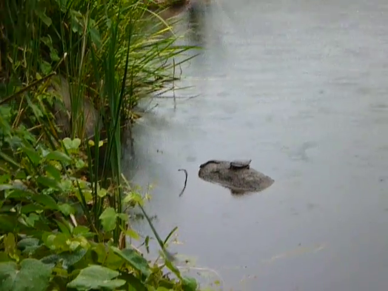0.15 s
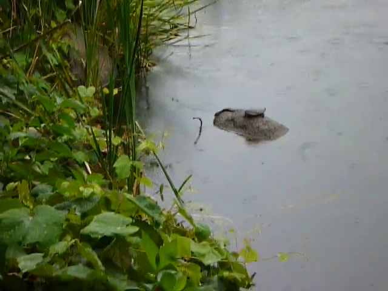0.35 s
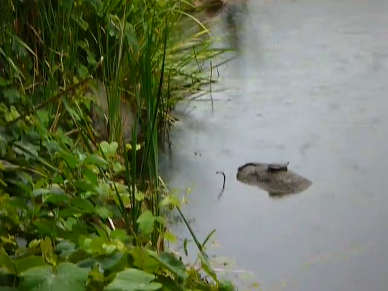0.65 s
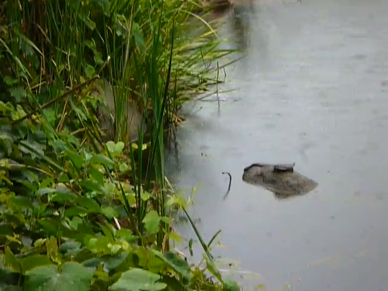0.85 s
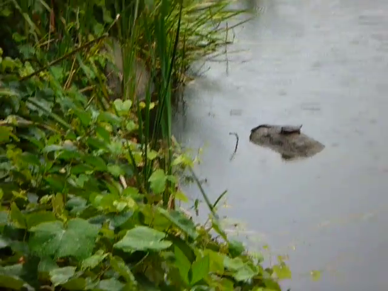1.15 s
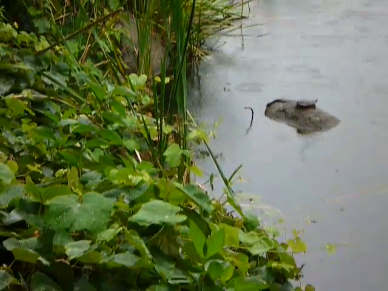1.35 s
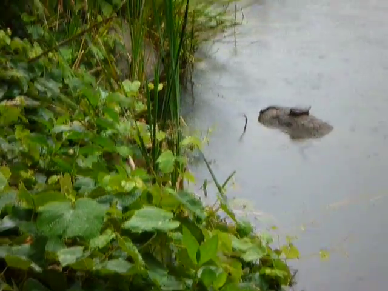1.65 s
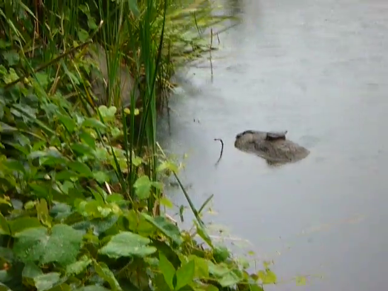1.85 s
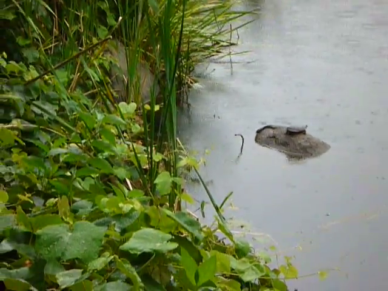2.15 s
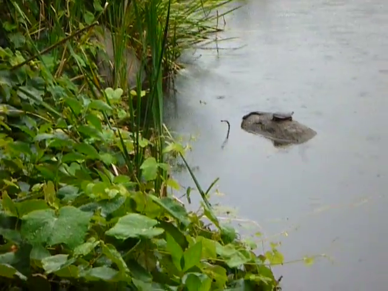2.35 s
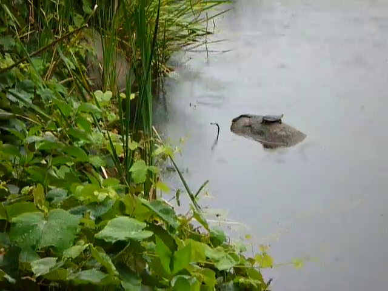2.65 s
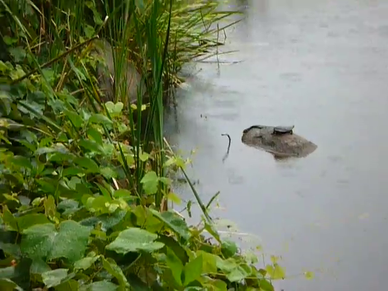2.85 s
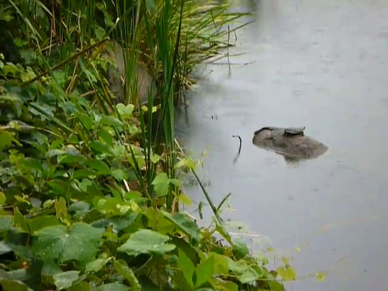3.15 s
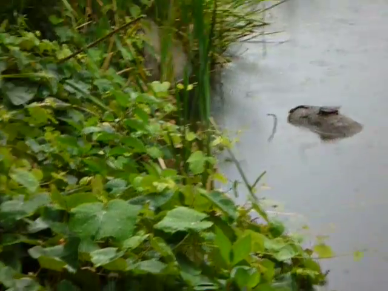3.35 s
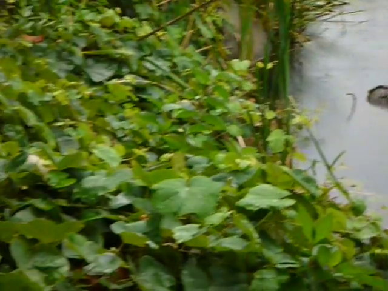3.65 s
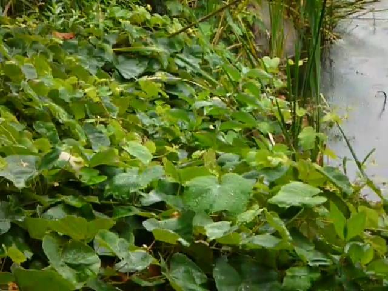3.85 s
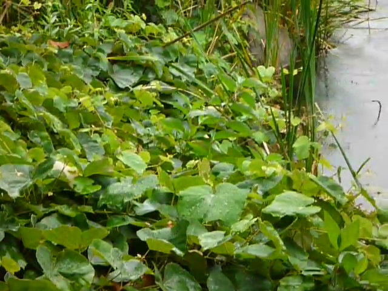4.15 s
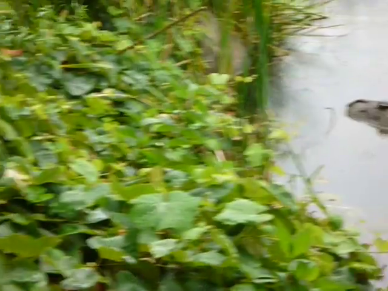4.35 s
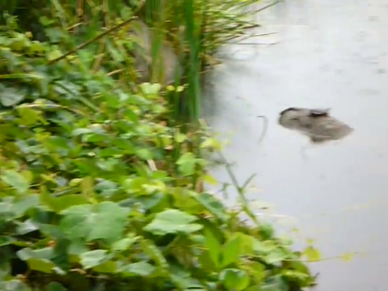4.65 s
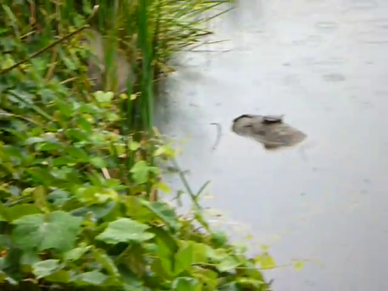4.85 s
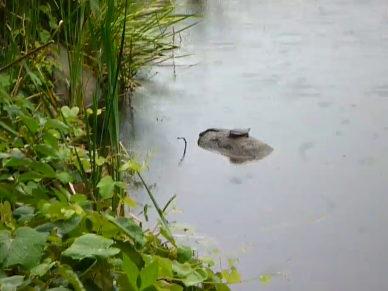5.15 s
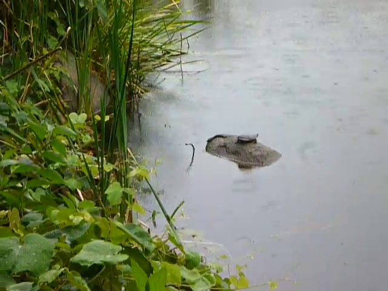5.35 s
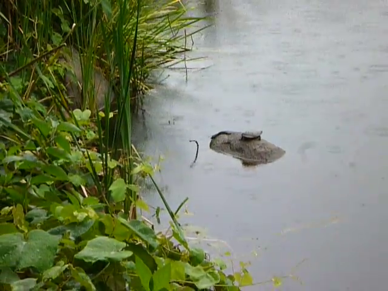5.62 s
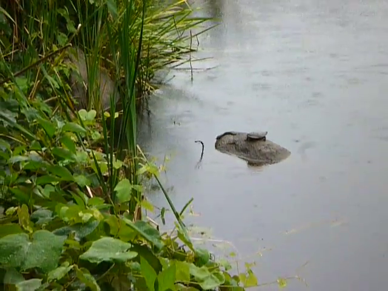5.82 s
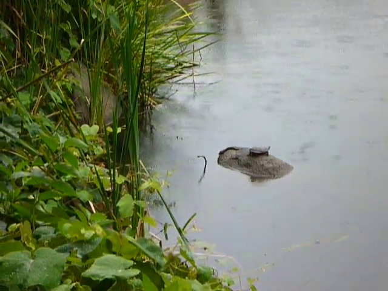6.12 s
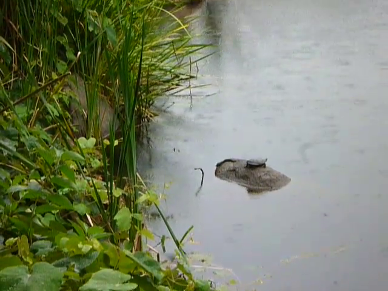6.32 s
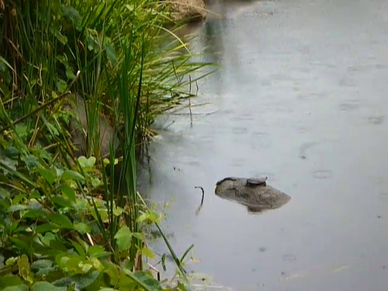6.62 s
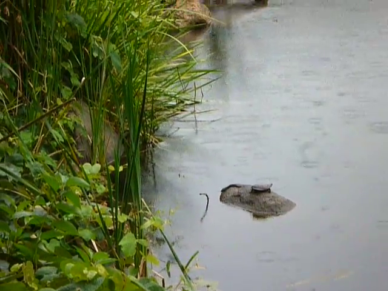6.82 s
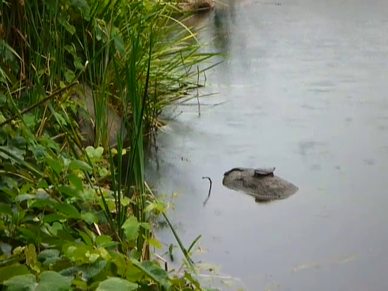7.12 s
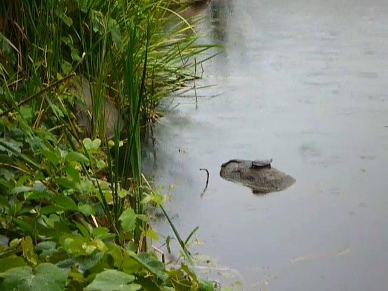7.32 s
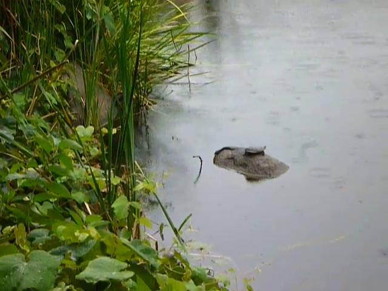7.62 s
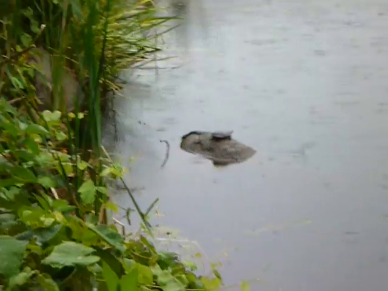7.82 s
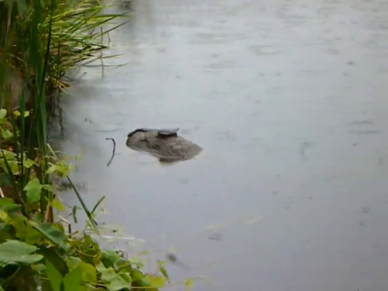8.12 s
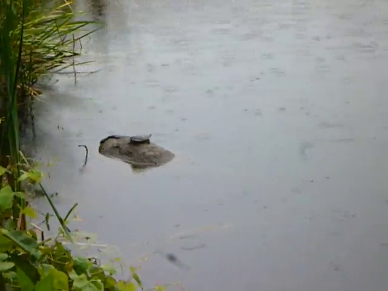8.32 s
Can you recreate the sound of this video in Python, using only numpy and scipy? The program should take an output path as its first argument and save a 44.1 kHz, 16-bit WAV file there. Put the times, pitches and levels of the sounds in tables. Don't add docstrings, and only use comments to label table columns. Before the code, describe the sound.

Dry, irregular ticks and hollow pops of rain on stretched fabric stand close in front, some softer and wetter like drips. They start sparse, then crowd into clusters around the middle and carry on to the end. A brief plastic clatter comes early. Far away, rain hushes over open water above traffic rumble, with short falling bird chirps and a thin insect hiss. Slightly dull small-camera sound outdoors.

```python
import sys
import numpy as np
from scipy import signal
from scipy.io import wavfile
from scipy.ndimage import uniform_filter1d

SR = 44100
rng = np.random.default_rng(int(sys.argv[2]) if len(sys.argv) > 2 else 0)


def store_wav(level_fs):
    pcm = np.round(np.clip(np.atleast_2d(level_fs), -1, 1) * 32767)
    wavfile.write(sys.argv[1], SR, pcm.T.astype(np.int16))


def volts_from_decibels(level):
    exponent = np.asarray(level, float) / 20
    return 10 ** exponent


N = 373968
LEAD_MS = 0.3

# (time [s], peak level [dB], wetness of the spot [0-1])
SLACK = [(.6387, -25, 1.), (1.0599, -23.5, 1), (1.1025, -24.5, .6), (1.6082, -27.5, .5), (2.1771, -22, .05),
         (2.8388, -24.5, 0.8), (3.049, -25, 0.8), (3.0996, -19, 1.), (3.3327, -21.5, .19),
         (3.5418, -24.5, 0.8), (3.7517, -20, 1.), (4.0591, -19, 0.9), (4.6865, -24, 1.), (4.7521, -16, .25),
         (4.9498, -16.5, 0.12), (5.0074, -15.5, 0.7), (5.0772, -23.5, 0.7), (5.7806, -23.5, .16),
         (6.2794, -26, .65), (7.181, -24.5, 0.2), (7.2566, -22.5, 0.8), (7.5955, -23, 0.9),
         (7.7382, -19.5, 0.3)]
# (time [s], peak level [dB], wetness [0-1])
WIDE = [(.8579, -30, 1.), (1.068, -24, 0.4), (1.0798, -12, .45), (1.1509, -25, 0.3), (1.4105, -25, .3),
        (1.4338, -26.5, .3), (1.7566, -20.5, .39), (1.9783, -25, 0.2), (2.698, -25.5, .5), (3.329, -22, .4),
        (3.3441, -23, 0.4), (3.3802, -27, 0.5), (3.7716, -28.5, .6), (4.0028, -27.5, .35),
        (4.0806, -28, 0.3), (4.2336, -16.5, 0.76), (4.241, -20.5, 0.3), (4.5241, -12, 0.4),
        (4.6548, -25, .1), (6.0178, -18.5, .18), (6.0598, -21.5, .2), (6.1939, -24.5, 1.),
        (7.0039, -20.5, .44), (7.4376, -18, 0.15), (7.4529, -26, .5), (7.8523, -31, .56),
        (8.1255, -23.5, 0.6), (8.2632, -22, .5)]
# (time [s], peak level [dB], wetness [0-1])
FIRM = [(.7368, -25.5, 0.12), (1.359, -29, 0.2), (1.7947, -21, 0.5), (2.1285, -23.5, .26),
        (2.2511, -24, 0.06), (2.2579, -24.5, .22), (2.7539, -24.5, 0.7), (2.7625, -19.5, .4),
        (3.3107, -23, .5), (4.1671, -15, 0.43), (4.9435, -20.5, 0.2), (5.2897, -21, .7), (5.4571, -25, 0.4),
        (5.4821, -22, 0.16), (5.6017, -24, .3), (5.7581, -17, 0.3), (6.0301, -19, .5),
        (6.4883, -23.5, 0.13), (6.5381, -26.5, .14), (7.173, -20, 0.12), (7.3409, -23.5, .65),
        (7.3607, -24.5, 0.4), (8.2711, -26, 0.2)]
# (time [s], peak level [dB], wetness [0-1])
TAUT = [(.4234, -15, 0.37), (1.107, -24.7, .05), (2.2002, -26, 0.15), (2.3873, -25.6, .15),
        (2.4251, -20.5, .12), (2.6786, -25.5, .3), (3.0517, -25, .25), (3.8388, -27.5, .4),
        (3.9453, -25.5, 0.3), (4.4312, -30.5, 0.3), (4.4794, -21, .16), (4.8292, -27, .24),
        (5.5774, -21, .13), (5.5854, -27.5, 0.13), (5.6281, -16.5, .2), (5.8476, -16, 0.8),
        (6.2454, -19, 0.24), (6.6697, -25.5, 0.4), (6.8538, -22.5, .14), (7.7132, -25, .35),
        (7.8576, -23, 0.3), (7.8676, -21, 1.), (8.373, -23, .15)]
# (time [s], peak level [dB], wetness [0-1])
RIM = [(2.4662, -30, 0.1), (4.2552, -17, 0.12), (5.2211, -25.5, 0.2), (5.6862, -21.5, 1.),
       (5.8196, -27, .6), (6.0238, -29, 1.), (6.272, -22.5, 0.1), (6.3925, -26, .3), (6.6073, -22, .8),
       (7.9142, -21, 0.1), (8.1018, -25, .3), (8.2739, -24.5, 1.)]
# (time [s], peak level [dB], wetness [0-1])
DRIPS = [(.0829, -31, .7), (.7881, -26.5, .7), (2.1546, -26, .35), (2.1916, -17, 0.9), (2.6811, -27.5, 1.),
         (4.222, -29, .5), (4.5152, -26, .4), (4.8976, -30.5, .4), (4.9349, -25.5, .5), (4.9865, -27, .6),
         (5.1463, -24.5, 0.5), (5.1927, -26.5, .7), (6.4544, -30, .1), (6.5129, -27.5, 1.),
         (7.1577, -27, .3), (7.9539, -18, 1.), (8.3044, -24.5, 0.33)]
# (time [s], peak level [dB], wetness [0-1])
SMACKS = [(3.1257, -29.5, 0.8), (4.8726, -15, 1.), (5.3273, -16, .8), (5.3584, -22, 1.),
          (5.4384, -26.5, 1.), (6.3159, -21, .9), (6.3385, -27, 0.84), (7.2619, -29, .1), (7.327, -19, 1),
          (7.9402, -18.5, 0.6)]
# (time [s], peak level [dB], wetness [0-1])
SMALL = [(.7615, -29, .25), (1.1364, -33, .05), (1.2762, -32, 0.5), (1.3356, -31, 0.1), (1.463, -31.5, .4),
         (1.638, -28, .3), (1.8881, -32, 1.), (2.2127, -28, 0.3), (2.5207, -33, .05), (2.6013, -28.5, .6),
         (2.7907, -33, .08), (3.1802, -28, 0.2), (4.244, -25, .7), (4.3517, -30, .3), (4.4973, -33, 0.3),
         (4.8663, -28.5, 0.5), (5.2723, -31, .5), (5.4682, -27, 0.3), (6.0727, -28.5, .2),
         (6.0973, -29, .5), (6.1327, -29, 0.14), (6.3835, -28, 0.35), (6.6524, -32, .1), (6.9546, -29, .2),
         (7.2743, -26, .6), (7.4294, -30, 0.15), (7.4726, -31, .05), (7.5292, -29, .3), (8.1515, -30, .2),
         (8.197, -27, .4)]
# (drops as above, spring of the cloth [Hz], stretch of the contact time [ratio])
SPOTS = [
    (SLACK, 370, 0.93),
    (WIDE, 546, 1.06),
    (FIRM, 605, 1.04),
    (TAUT, 734, 1.08),
    (RIM, 1180, 0.77),
    (DRIPS, 710, 1.86),
    (SMACKS, 500, 0.66),
    (SMALL, 620, 1.1),
    ([(3.529, -4, 0.58)], 480, .85),
]


def level(x, db):
    return x * volts_from_decibels(db) / np.sqrt(np.mean(x ** 2))


def band(x, hz, width_hz):
    return signal.lfilter(*signal.iirpeak(hz, hz / width_hz, fs=SR), x)


def walk(rate):
    hold = int(SR / rate)
    steps = np.repeat(rng.standard_normal(N // hold + 1), hold)
    return 1.2 * uniform_filter1d(uniform_filter1d(steps, hold), hold)[:N]


def add(out, s, sound):
    i = int(s * SR)
    out[i:i + len(sound)] += sound[:N - i]


def tap(hz, contact_ms, damping, chance, near_db=-2.5, echo_ms=0.22):
    ms = np.arange(len(chance)) * 1000 / SR
    push = np.exp(-0.5 * ((ms - LEAD_MS) / contact_ms) ** 2)
    push = push + 0.49 * np.exp(-0.5 * ((ms - LEAD_MS) / 0.02) ** 2)

    w = 2 * np.pi * hz
    spring = signal.lfilter(*signal.bilinear([1, 0, 0], [1, 2 * damping * w, w * w], SR), push)
    spring = spring / spring.max() - 0.31 * np.interp(ms - echo_ms, ms, push)

    rise = 1 - np.exp(-np.maximum(ms - LEAD_MS, 0) / 0.13)
    ring = rise * np.exp(-ms / 4.2) * level(band(chance, 1.79 * hz, 0.85 * hz), -23)
    spray = rise * np.exp(-ms / 1.5) * level(chance, -24)
    return spring + volts_from_decibels(-near_db) * (ring + spray)


def drops():
    dry_contact_ms, wet_contact_ms = 0.033, 0.063
    low, high = np.array([0.7, -22, 0.19]), np.array([2.4, -13, 0.34])
    table = [(*row, hz, stretch) for rows, hz, stretch in SPOTS for row in rows]
    chances = rng.standard_normal((len(table), 600))
    luck = low + (high - low) * rng.random((len(table), 3))
    out = np.zeros(N)
    for (s, db, wet, hz, stretch), chance, (late_ms, splash_db, echo_ms) in zip(table, chances, luck):
        contact_ms = stretch * (dry_contact_ms + (wet_contact_ms - dry_contact_ms) * wet)
        contact_ms = np.clip(contact_ms, 0.015, 0.15)
        damping = np.clip(wet, 0.05, 1.2)
        near_db = 0.41 * (db + 16.5)
        hit = volts_from_decibels(db) * tap(hz, contact_ms, damping, chance, near_db, echo_ms)
        add(out, s, hit)
        add(out, s + late_ms / 1000, volts_from_decibels(splash_db) * hit)
    return out


def rings(fade_ms=1.3):
    # (time [s], pitch [Hz], level [dB])
    singing = [(1.08, 2500, -38), (1.107, 1330, -29), (2.1921, 2750.0, -33), (2.7625, 1400.0, -30),
               (3.529, 1040, -43), (4.1671, 840, -29), (4.2336, 2440, -44), (4.2557, 2800, -46),
               (4.4794, 1570.0, -30), (4.5241, 1880, -39), (4.6865, 2160, -34), (4.7521, 1520, -22),
               (4.9426, 1510.0, -37), (4.9498, 1120.0, -29), (5.5776, 1790, -43), (5.6862, 1500.0, -25.5),
               (5.7581, 1180, -30), (6.0598, 1410, -30), (6.2454, 1270, -26), (6.6073, 1300, -26.5),
               (7.4376, 1400, -29.5), (7.7382, 1940, -47), (7.9142, 1800, -33), (7.9535, 1000.0, -47),
               (8.2711, 1560, -33), (8.3044, 2280.0, -42)]
    out, ms = np.zeros(N), np.arange(500) * 1000 / SR
    pushes = np.array([row[0] for rows, *_ in SPOTS for row in rows])
    envelope = (1 - np.exp(-ms / 0.3)) * np.exp(-ms / fade_ms)
    for s, hz, db in singing:
        start = pushes[np.argmin(np.abs(pushes - s))] + LEAD_MS / 1000
        add(out, start, volts_from_decibels(db + 2.5) * envelope * np.cos(2 * np.pi * hz * ms / 1000))
    return out


def patter(per_s=500, small_db=-53, spread_db=6.5):
    out = np.zeros(N)
    for hz in np.geomspace(450, 3000, 6):
        when, size = rng.random(N), rng.exponential(size=N)
        hits = (when < per_s / 6 / SR) * volts_from_decibels(small_db + spread_db * np.minimum(size, 3.4))
        one_drop = tap(hz, 0.031, 0.22, rng.standard_normal(600))
        out += signal.fftconvolve(hits, one_drop)[:N]
    return out


def catch():
    # (time [s], peak level [dB], length [ms])
    scrapes = [
        (1.6779, -12.5, 3),
        (1.6938, -17.5, 3.4),
        (1.7218, -31, 2),
    ]
    # (pitch [Hz], width [Hz], gain [dB])
    modes = [(1720, 420, 6.5), (2550, 640, 4), (4440, 470, 10.5), (4800, 400, 3.5), (6540, 800, -8.5)]
    out, ms = np.zeros(N), np.arange(900) * 1000 / SR
    chances = rng.standard_normal((len(scrapes), 900))
    add(out, 1.6719, -volts_from_decibels(-18.5) * tap(1500, 0.036, 0.3, chances[0]))
    add(out, 1.673, volts_from_decibels(-32) * np.exp(-ms / 9) * np.sin(2 * np.pi * 190 * ms / 1000))
    for (s, db, length_ms), chance in zip(scrapes, chances):
        scrape = chance * ms * np.exp(-ms / (0.27 * length_ms))
        body = volts_from_decibels(-11) * band(scrape, 3500, 6000)
        for hz, width_hz, gain_db in modes:
            body = body + volts_from_decibels(gain_db) * band(scrape, hz, width_hz)
        add(out, s, volts_from_decibels(db) * body / np.abs(body).max())
    return out


def wash(rain_db, rumble_db):
    # (frequency [Hz], density [dB per Hz])
    colour = [(26, -29), (45, -29), (55, -38.5), (64, -21.5), (124, -16.5), (287, -15), (531, -19.5),
              (826, -15.5), (1430, -21), (1710, -27), (4310, -37.5), (6560, -35.5), (7820, -48.5),
              (8730, -62.5), (11300, -91), (19200, -120)]
    hz_at, db_at = np.transpose(colour)
    low, high, swell = 0, 0, walk(0.93)
    for hz in np.geomspace(50, 8500, 23):
        db = np.interp(np.log(hz), np.log(hz_at), db_at) + 10 * np.log10(hz)
        db = db + 0.5 * swell + 1.44 * walk(11)
        noise = band(band(rng.standard_normal(N), hz, 0.54 * hz), hz, 0.54 * hz)
        noise = volts_from_decibels(db) * level(noise, 0)
        share = np.clip((hz - 250) / 350, 0, 1)
        low = low + (1 - share) * noise
        high = high + share * noise
    return volts_from_decibels(rain_db - 2.5) * level(high, 0) + volts_from_decibels(rumble_db - 0.8) * level(low, 0)


def engines():
    # (pitch [Hz], width [Hz])
    drones = [(126, 26), (205, 36)]
    # (time [s], swell [dB])
    revs = [
        [(1.2, 9.5), (2.1, 5.5), (3.3, 8.5), (3.9, 8.5), (7.6, 3.5)],
        [(1., 9.5), (1.55, 9), (2., 4), (2.9, 5.5), (6.9, 1), (7.9, 7)],
    ]
    idle_db, rev_s = (-59, -60), 0.2
    t = np.arange(N) / SR
    out = np.zeros(N)
    for (hz, width_hz), idle, swells in zip(drones, idle_db, revs):
        db = idle + sum(swell * np.exp(-0.5 * ((t - s) / rev_s) ** 2) for s, swell in swells)
        drone = band(band(rng.standard_normal(N), hz, width_hz), hz, width_hz)
        out += volts_from_decibels(db - 4) * level(drone, 0)
    return out


def insects():
    # (pitch [Hz], width [Hz], level [dB])
    choirs = [(6840, 99, -70), (6300, 160, -71)]
    out = np.zeros(N)
    for hz, width_hz, db in choirs:
        waver = volts_from_decibels(1.2 * walk(4))
        out += level(waver * band(rng.standard_normal(N), hz, width_hz), db)
    return out


def bird():
    # (time [s], length [s], start pitch [Hz], end pitch [Hz], level [dB])
    whistles = [
        (.908, .034, 3540, 2740, -48),
        (.944, 0.077, 2900, 2790, -53),
        (1.31, .042, 3620, 2810, -48),
        (5.378, .026, 2800, 2490, -48),
        (5.71, 0.034, 3140, 2480, -48),
        (5.745, 0.048, 2550, 2450, -57),
    ]
    out = np.zeros(N)
    for s, length_s, start_hz, end_hz, db in whistles:
        part = np.linspace(0, 1, int(length_s * SR))
        hz = end_hz + (start_hz - end_hz) * (1 - part) ** 1.5
        swell = np.sin(np.pi * part ** (2.1 if length_s < 0.05 else 0.5))
        add(out, s, volts_from_decibels(db) * swell * np.sin(2 * np.pi * np.cumsum(hz) / SR))
    bank = rng.standard_normal(4000) * np.exp(-np.arange(4000) / SR / 0.03)
    return out + volts_from_decibels(-34) * signal.fftconvolve(out, bank)[:N]


def scene():
    # (time [s], rain level [dB], rumble level [dB])
    far_levels = [
        (0.0, -45, -49.5),
        (0.87, -45.5, -48.5),
        (8.48, -45.5, -48.5),
    ]
    s, *columns = np.transpose(far_levels)
    rain_db, rumble_db = (np.interp(np.arange(N) / SR, s, column) for column in columns)
    near = drops() + rings() + patter() * volts_from_decibels(rain_db + 41.5) + catch()
    far = wash(rain_db, rumble_db) + engines() + insects() + bird()
    return (near + far)[None]


def duck(x, limit_db=-9, depth_db=-0.5, release_s=0.66):
    block = 256
    peak = np.abs(np.resize(x, (N // block + 1, block))).max(axis=1)
    over = np.maximum(20 * np.log10(peak + 1e-9) - limit_db, 0)
    pull = signal.lfilter([0, 1], [1, -np.exp(-block / SR / release_s)], over)
    return x * volts_from_decibels(depth_db * uniform_filter1d(np.repeat(pull, block), block)[:N])


def band_limit(x):
    return signal.sosfilt(signal.butter(12, 8880, fs=SR, output="sos"), x)


def record(dry):
    top_hz, offset = 7824, -0.052
    ducked = duck(dry[0])[None]
    soft = signal.sosfiltfilt(signal.butter(7, top_hz, fs=SR, output="sos"), ducked)
    cut = signal.sosfiltfilt(signal.cheby2(12, 35, 9500, fs=SR, output="sos"), soft)
    return band_limit(cut + offset)


dry = scene()
out = record(dry)
store_wav(out)
```